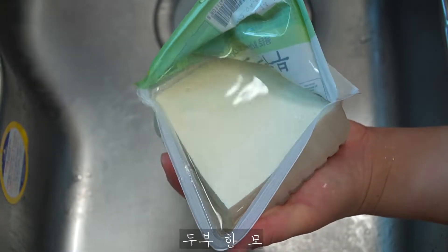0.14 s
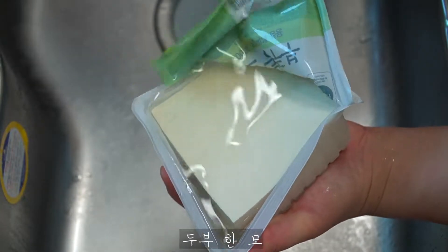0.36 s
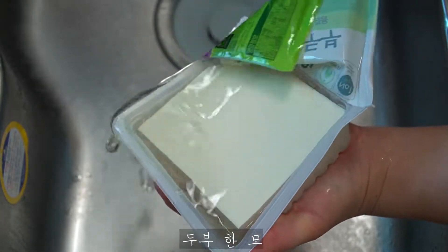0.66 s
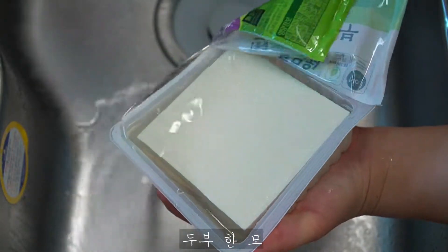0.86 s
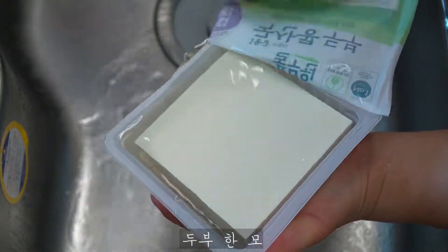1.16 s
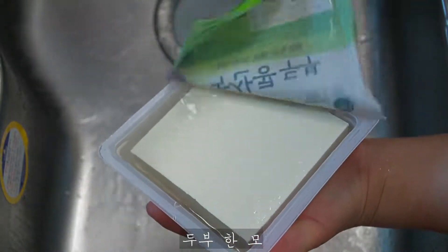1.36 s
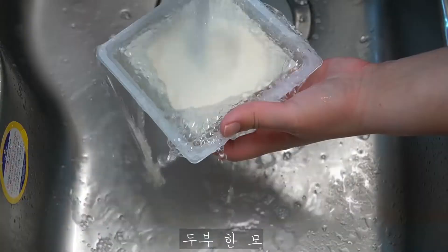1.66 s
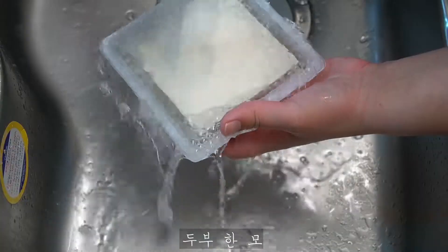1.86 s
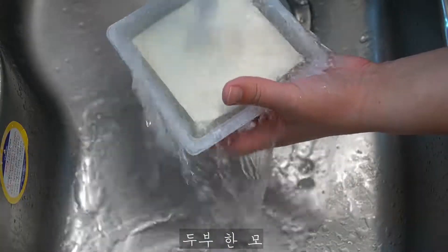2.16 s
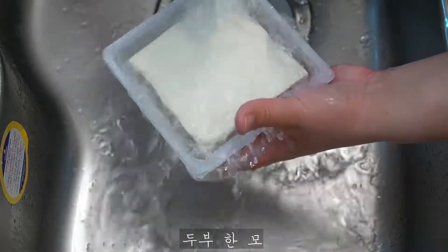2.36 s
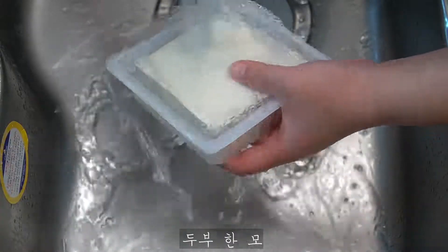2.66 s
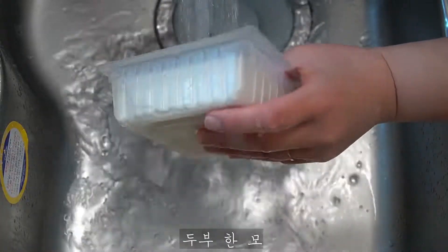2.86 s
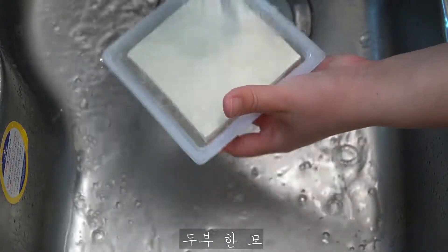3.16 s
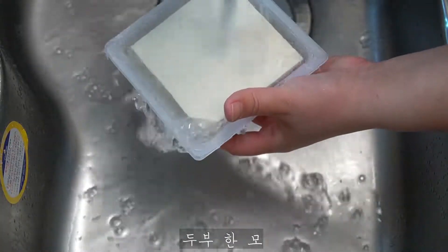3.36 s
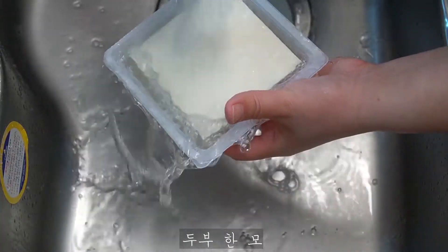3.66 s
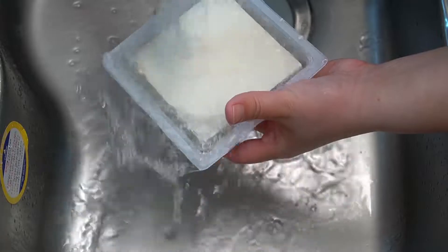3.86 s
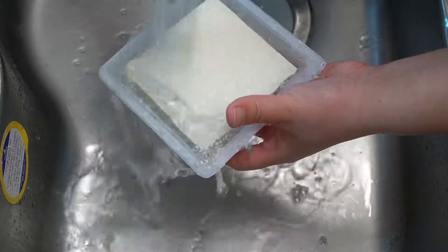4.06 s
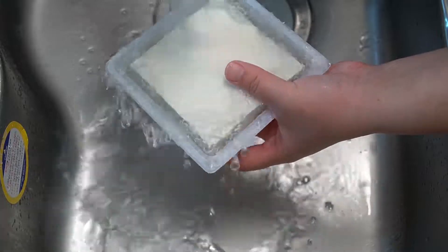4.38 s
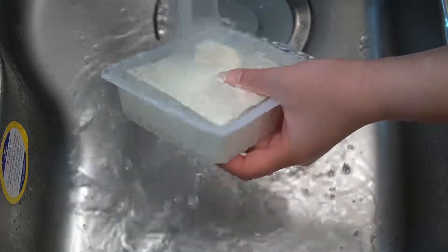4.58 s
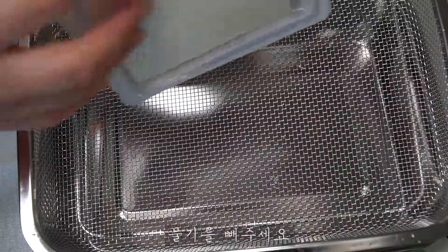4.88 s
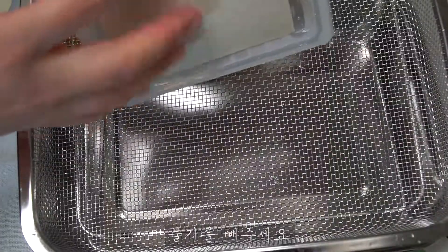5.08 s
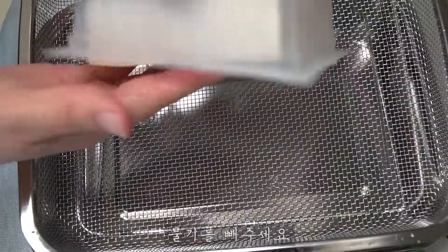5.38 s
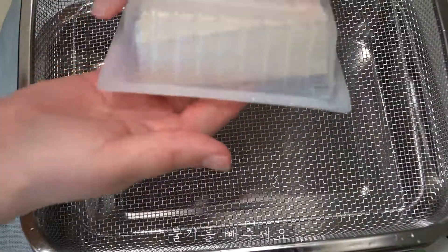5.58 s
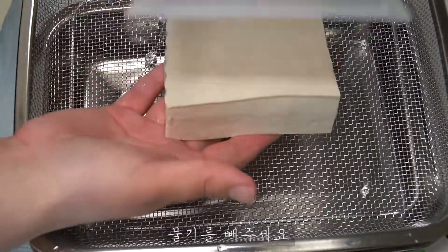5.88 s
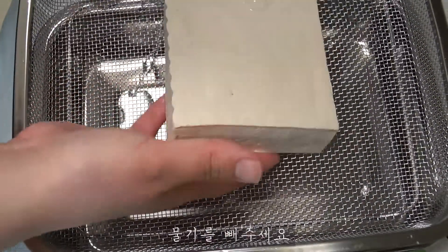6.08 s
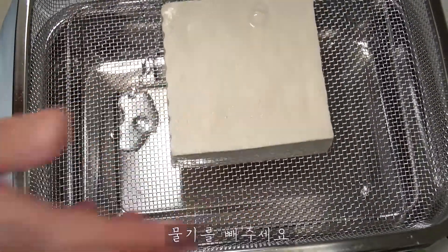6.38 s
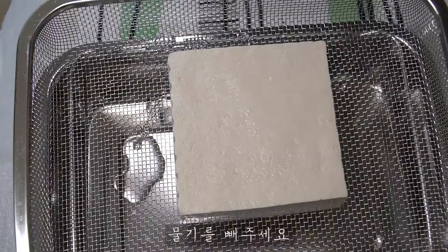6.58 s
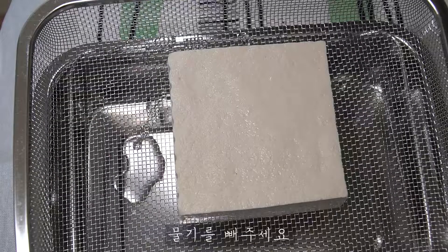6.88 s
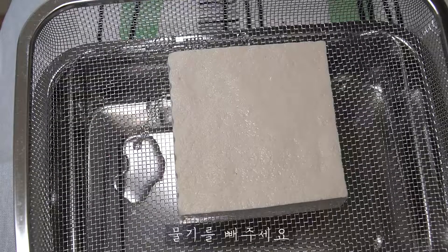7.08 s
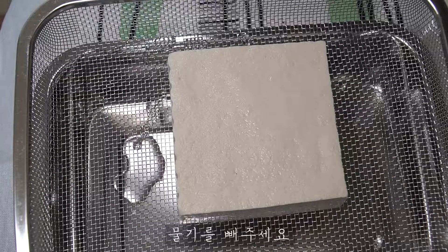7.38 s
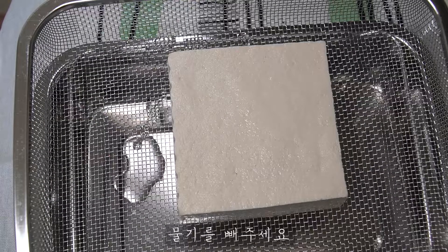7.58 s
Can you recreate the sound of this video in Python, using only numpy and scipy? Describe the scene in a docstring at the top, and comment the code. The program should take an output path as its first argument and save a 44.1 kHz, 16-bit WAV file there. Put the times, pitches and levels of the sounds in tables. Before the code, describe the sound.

Close up in a home kitchen, thin plastic film snaps and rustles off a small tub while liquid dribbles onto a steel sink. A tap abruptly hisses in, splashing on the tub and drumming below with a few bubbly notes. The water cuts off; over low hum, hands and a wet tofu block rub and knock a wire tray, and the metal pan shifts with dull thuds.

```python
"""Film snaps and rustles as it is peeled off a small tub, while brine dribbles into a steel sink. At 1.72 s the
scene changes: a tap sprays into the tub and the overflow drums on the sink; at 4.78 s the scene changes again
and both fall silent. Last, the wet block is turned out on a wire tray in a steel pan. A low kitchen hum runs
throughout. Shaped noise makes the film, spray and hum; clicks through resonances make the drops, sink and tray;
gliding tones make the bubbles and, with a wobble, the air in the filling tub."""
import sys
import numpy as np
from scipy import signal
from scipy.io import wavfile

SR = 44100
rng = np.random.default_rng(int(sys.argv[2]) if len(sys.argv) > 2 else 0)


def generate_wav(sig):
    """Save sig (samples, or channels by samples) to the path in sys.argv[1] as 16-bit PCM at SR."""
    pcm = np.round(np.clip(np.atleast_2d(sig).T, -1, 1) * 32767).astype(np.int16)
    wavfile.write(sys.argv[1], SR, pcm)


N = 341334

# Film snaps: start_s, level_db, colour_hz, colour_width (share of colour_hz), fall_by_60_db_s, rise_s
FILM_SNAPS = [(0.0103, -14.5, 5070, 0.52, 0.082, .0003), (0.0822, -10.5, 4270, 0.63, 0.1, .0004),
              (0.189, -27, 2100, 0.27, 0.14, 0.0082), (0.395, -31.5, 2500, 0.46, 0.24, 0.0089),
              (0.417, -27.5, 2640, 0.34, 0.1, .004), (0.505, -29.5, 2600, 0.38, 0.3, 0.0061),
              (0.5448, -25.5, 2070, .6, 0.25, .0005), (0.5771, -8.5, 2500, 0.68, 0.092, 0.00026),
              (0.6211, -10.5, 4870, 0.58, 0.072, 0.00026), (0.675, -18, 6050, .3, 0.036, .0003),
              (0.683, -15, 4420, 0.59, 0.05, 0.0028), (0.7575, -18.5, 1500, 0.94, 0.23, 0.0022),
              (0.787, -16.5, 3870, 1, 0.097, 0.0076), (0.872, -30.5, 7100, 0.75, 0.075, 0.006),
              (0.9516, -24.5, 1650, 1, 0.078, 0.00092), (1.052, -28, 1490, 0.54, 0.061, 0.0008),
              (1.101, -22, 1530, 0.32, 0.15, 0.00033), (1.1396, -24.5, 6240, .4, .1, 0.00034),
              (1.159, -13.5, 3900, 1, 0.15, 0.00027), (1.3072, -31.5, 6000, 1, 0.12, .001),
              (1.3301, -18.5, 2390, 1, 0.087, 0.0031), (1.4268, -28, 1800, 0.72, 0.2, 0.0052),
              (1.5668, -38, 1510, 0.57, 0.082, .0013), (1.593, -30, 7450, 1, 0.096, 0.0059),
              (1.645, -31, 2220, .33, .12, .007)]
# Film rustle over time: time_s, level_db
FILM_RUSTLE = [(0.0, -45), (0.21, -81), (0.45, -58), (0.66, -39.5), (0.75, -61), (0.9, -57), (1.06, -59),
               (1.26, -51.5), (1.55, -78), (1.71, -57)]
# Colour of the rustle before its tilt: pitch_hz, level_db (per Hz)
FILM_COLOUR = [(900, -12), (1600, -15), (2650, -5.5), (4000, -17.5), (8000, -19), (16000, -7)]
RUSTLE_TILT_DB = -1.9   # per octave
SNAP_PAN_DB = -1.3   # left minus right

# Slaps of spilled water on the steel: start_s, level_db
WATER_SLAPS = [(0.576, -18.5), (0.758, -19), (0.949, -28), (1.033, -34), (1.051, -31.5), (1.101, -27),
               (1.314, -27.5), (1.568, -34.5), (1.639, -37)]
# Ways the sink sheet rings: pitch_hz, width_hz, level_db
SINK_MODES = [(63, 25, -15.5), (149.8, 30, 2.5), (276.5, 23, -10.5), (296.8, 39.3, -1), (350, 36, -4.5),
              (383.3, 38, -8.5), (412.5, 20, -12.5), (484.5, 68, -16.5), (539, 53, -17.5), (576, 30, -17),
              (598.4, 43, -16.5), (669, 37, -11), (746, 68, -11.5), (835.6, 70, -13), (1066, 184, -17.5),
              (1276, 540, -15.5), (1700, 350, -25.5)]
# Thin stream on the sink floor: time_s, drumming_db, hardness_db (per octave), boom_db (modes below 200 Hz)
SINK_STREAM = [(0, -59, 3, -66), (.4, -54.5, 4.5, -65), (.74, -48.5, 6, -60), (.79, -39, 4.5, -37),
               (1.05, -42.5, 1.5, -35.5), (1.4, -36.5, 4, -41), (1.54, -58, 5.5, -48),
               (1.71, -38, 3.5, -35), (1.73, -30, 3, -31.5), (2.35, -29.5, -0.5, -33), (2.8, -34, 4, -31),
               (2.9, -36.5, 7, -49), (3.12, -36.5, 6.5, -33), (3.2, -32.5, -4.5, -48),
               (3.45, -36.5, -6, -43.5), (3.64, -37.5, -3, -35), (3.7, -32.5, 0.5, -33.5),
               (4.78, -33, 4.5, -38)]
# Lumps of water landing on the sink: start_s, hold_s, drumming_db, boom_db (modes below 200 Hz)
WATER_LUMPS = [(.008, 0.021, -41.5, -56), (0.173, 0.02, -45, -64), (0.406, .02, -47.5, -58),
               (0.568, 0.0018, -23.5, -52), (0.652, 0.018, -37.5, -60), (0.752, 0.022, -24.5, -31),
               (0.831, 0.024, -35, -30), (0.923, .09, -54, -38), (1.185, 0.028, -28, -34),
               (1.313, 0.037, -33, -35), (1.394, 0.07, -33, -44), (1.563, 0.011, -43, -33),
               (1.816, 0.031, -35, -29), (1.897, .05, -37, -26), (2.007, 0.027, -24.5, -46),
               (2.093, 0.082, -22.5, -26), (2.187, 0.061, -31, -37), (2.284, 0.088, -30.5, -25.5),
               (2.408, 0.043, -26, -39), (2.48, 0.043, -37, -31), (2.567, 0.074, -25, -26),
               (2.79, 0.055, -31.5, -30), (2.965, 0.04, -30.5, -44), (3.366, 0.0051, -24.5, -48),
               (3.652, .05, -29, -40), (3.777, 0.024, -28.5, -30), (3.849, 0.04, -30, -29.5),
               (3.956, 0.032, -28, -38), (4.095, 0.055, -27.5, -30), (4.172, 0.032, -27, -33),
               (4.272, 0.027, -33, -44), (4.389, 0.031, -27, -32), (4.523, 0.028, -41, -43),
               (4.624, 0.1, -34, -33.5)]
LUMP_RISE_S, LUMP_T60_S, LUMP_HARDNESS_DB = 0.0098, 0.13, 0.65   # hardness per octave
LANDING_DB = 22   # thump as a lump lands, added to its drumming or boom level

# Colour of the kitchen hum: pitch_hz, level_db (per Hz)
HUM_COLOUR = [(25, -84), (54, -5.5), (100, -14.5), (137, -1), (222, -22), (430, -23), (1020, -30.5),
              (2000, -31), (3500, -33.5), (5500, -31), (9000, -38.5), (16000, -39.5)]
# Bands that stand out of the hum once the water stops: pitch_hz, width_hz, level_db
HUM_BANDS = [(458, 90, 4), (1170, 90, 2), (1810, 120, 2), (3290, 600, 6.5), (5400, 450, -3),
             (6820, 500, -3)]
HUM_DB = -49.5

# Tap spray over time: time_s, level_db
TAP_SPRAY = [(1.73, -26), (2.55, -25.5), (2.82, -28.5), (2.91, -24), (3.1, -25.5), (3.35, -27.5),
             (3.7, -26.5), (4.76, -27)]
# Colour of the spray: pitch_hz, level_db (per Hz)
SPRAY_COLOUR = [(710, -13), (1260, -15), (1780, -14.5), (2180, -5.5), (2700, -5), (4050, -5), (5300, 2.5),
                (8300, -2.5), (13600, 1.5), (15900, 1.5)]
# Bands that the basin lifts out of the spray: pitch_hz, width_hz, level_db
BASIN_BANDS = [(2377, 310, -1), (3710, 200, -16), (5180, 190, -3), (5900, 150, -12), (7230, 770, -18)]
# Splashes as the jet breaks on the rim: start_s, level_db, colour_hz
RIM_SPLASHES = [(2.0531, -12, 5460), (2.1544, -11.5, 5300), (2.209, -15, 6800), (2.2547, -14, 7250),
                (2.3464, -20, 4590), (2.501, -15, 5050), (2.713, -10, 3270), (2.8554, -6.5, 6100),
                (3.1108, -10.5, 5180), (3.318, -10, 5300), (3.414, -15.5, 5400), (3.6677, -12, 5440),
                (4.0094, -11, 5680), (4.109, -8.5, 4000), (4.2756, -10, 5800), (4.4627, -13.5, 7900),
                (4.6114, -17, 7650), (4.7041, -10.5, 6750), (4.7625, -10, 4730)]
# Air above the water in the filling tub: time_s, level_db, pitch_hz
TUB_AIR = [(3.141, -46, 1233), (3.2, -39, 1282), (3.28, -38, 1265), (3.34, -36, 1247), (3.42, -37, 1244),
           (3.5, -56, 1140)]
# Bubbles in the filling tub: start_s, level_db, pitch_hz (at the start)
TUB_BUBBLES = [(3.248, -30, 1310), (3.3034, -22.5, 1240), (3.3723, -13.5, 1227), (3.459, -28, 1080),
               (4.7698, -18, 1274)]
TAP_ON_S, TAP_OFF_S = 1.718, 4.781
SPLASH_RISE_S, SPLASH_T60_S = 0.0027, 0.13
DROP_CYCLES = 16   # pitch of a drop divided by its resonance width

# Hands and block rub the wires: start_s, rise_s, level_db, fall_by_60_db_s, brightness_db (per octave)
TRAY_RUBS = [(5.27, .01, -37.5, 0.32, 0.5), (5.319, 0.0047, -44, 0.25, -1),
             (5.635, 0.0036, -34, 0.37, -0.5), (5.645, 0.015, -32, 0.18, -1),
             (5.804, 0.0061, -23.5, 0.25, 6), (5.99, 0.042, -39.5, 0.2, 3), (6.124, .006, -47.5, 0.36, 0),
             (6.229, 0.081, -24.5, 0.17, 1), (6.269, 0.04, -22.5, 0.23, -0.5),
             (6.629, 0.0052, -44, 0.58, -0.5), (6.86, .02, -52, 0.2, 9), (7.321, 0.038, -24, 0.31, 0.5),
             (7.43, 0.03, -34, 0.27, -2.5), (7.566, .016, -33.5, 1.2, -0.5), (7.64, 0.044, -43, 1.1, 8)]
# Knocks on the tray: start_s, level_db, brightness_db (per octave)
TRAY_KNOCKS = [(5.282, -51, 13), (5.325, -54, 11), (5.641, -48.5, -9), (5.809, -28, 2.5), (6.029, -57, -2),
               (6.645, -44.5, 2)]
# Ways the tray and pan ring: pitch_hz, level_db, fall_by_60_db_s
TRAY_MODES = [(501, 0, 0.063), (822, 5.5, 0.032), (993, -19, 0.11), (1097, -0.5, 0.086), (1310, -4, 0.11),
              (1370, -12.5, 0.089), (1666, -2, 0.081), (1805, -11, 0.064), (2036, -12, 0.079),
              (2178, -3.5, 0.12), (2274, -1, 0.077), (2550, -29, .1), (2765, -3.5, 0.066),
              (2896, -11.5, 0.18), (3450, -13, 0.21), (3916, -9.5, 0.036), (4610, -10, 0.056),
              (5190, -9.5, 0.025), (6710, -14.5, 0.034)]
# Colour of the wet hiss before its tilt: pitch_hz, level_db (per Hz)
TRAY_HISS_COLOUR = [(180, -45), (300, -8.5), (502, -14), (603, -3.5), (787, -7), (2790, -4), (3130, -15.5),
                    (4500, -15), (8000, -21.5), (16000, -26)]
# The pan is shifted: start_s, thud_db, hollow_db, rim_db
PAN_SHIFTS = [(7.12, -42, -52.5, -70), (7.225, -45, -41, -60), (7.325, -31.5, -42, -39),
              (7.44, -47, -41.5, -42), (7.52, -46, -41.5, -42), (7.56, -27.5, -41, -38),
              (7.625, -40, -55, -43.5), (7.69, -47, -55, -62)]
# Thud, hollow and rim of the pan, one row each: pitch_hz, width_hz
PAN_PARTS = [(140, 14), (400, 22), (985, 57)]
SHIFT_RISE_S, SHIFT_HOLD_S, SHIFT_T60_S = 0.031, 0.032, 0.2
HANDS_NEAR_DB = -57.5   # faint steady touching under the rubs

# How alike left and right are: pitch_hz, likeness (0 to 1)
STEREO_LIKENESS = [(60, 1.0), (180, 1.0), (550, 0.6), (1650, 0.77), (4970, 0.55), (15000, 0.22)]
SIDES = np.array([[1], [-1]])   # left, right
RISE_DB = 24.5   # a swell climbs this much during its rise
CUTOFF_HZ = 15900


def from_db(db):
    """Turns decibels into a gain."""
    return 10 ** (np.asarray(db) / 20)


def rms_one(x):
    """Scales a sound to an average strength (rms) of 1."""
    return x / np.sqrt(np.mean(x ** 2) + 1e-20)


def in_time(rows):
    """Draws straight lines between the rows: one curve per column after the time."""
    time_s, *columns = np.vstack(rows).T
    return [np.interp(np.arange(N) / SR, time_s, column) for column in columns]


def between(start_s, end_s):
    """1 inside the span, 0 outside, with 2 ms edges."""
    t = np.arange(N) / SR
    return np.clip(np.minimum(t - start_s, end_s - t) * 500, 0, 1)


def at_hz(points, hz):
    """Reads a pitch table at hz, with pitch spaced by octaves."""
    pitch_hz, value = np.array(points).T
    return np.interp(np.log(hz), np.log(pitch_hz), value)


def drift(rate_hz):
    """Slow chance of spread 1: noise at every 20th sample, smoothed twice by a low-pass."""
    r = np.exp(-40 * np.pi * rate_hz / SR)
    noise = rng.standard_normal(N // 20 + 2002)
    slow = signal.lfilter([1], [1, -2 * r, r * r], noise)[2000:]   # skip the filter's settling
    return np.interp(np.arange(N) / 20, np.arange(len(slow)), rms_one(slow))


def resonate(x, hz, width_hz):
    """Rings like one mode of a body: a two-pole resonance with gain 1 at its peak."""
    r = np.exp(-np.pi * width_hz / SR)
    feed = np.array([1, 0, -1]) * (1 - r * r) / 2
    back = [1, -2 * r * np.cos(2 * np.pi * hz / SR), r * r]
    return signal.lfilter(feed, back, x + 1e-18)


def lift(x, bands):
    """Adds resonances on top of the sound."""
    return x + sum(from_db(db) * resonate(resonate(x, hz, width_hz), hz, width_hz)
                   for hz, width_hz, db in bands)


def grains(per_s, spread_db):
    """Random clicks of uneven size and sign; rms 1."""
    size_db = spread_db * np.minimum(rng.exponential(1, N), 4)   # a cap keeps giants rare
    sizes = from_db(size_db) * rng.choice([-1, 1], N)
    return rms_one(sizes * (rng.random(N) < per_s / SR))


def swells(start_s, peak_db, rise_s, hold_s, t60):
    """One row of gain per event: rise, hold, then fall by 60 dB."""
    t = np.arange(N) / SR
    for s, db, rise, hold, fall in np.broadcast(start_s, peak_db, rise_s, hold_s, t60):
        i, j = round(s * SR), round((s + rise + hold + fall) * SR)
        corners_s = np.cumsum([0, rise, hold, fall])
        gain = np.zeros(N)
        gain[i:j] = from_db(db + np.interp(t[i:j] - s, corners_s, [-RISE_DB, 0, 0, -60]))
        yield gain


def coloured(mid, spectrum, tilt_db, patchy_db, flicker_hz=19.5):
    """Third-octave bands with own level, flicker and stereo width; rms near 1 before tilt and flicker."""
    out, power = 0, 0
    together = drift(flicker_hz)   # the flicker that all bands share
    side = rng.standard_normal(N)
    edges = 25 * 2 ** (np.arange(29) / 3)
    edges = edges[edges > spectrum[0][0] * .8]
    for k, (low, high) in enumerate(zip(edges, edges[1:])):
        band = signal.butter(2, [low, high], "band", fs=SR, output="sos")
        m, s = signal.sosfilt(band, [mid, side]) * (-1) ** k   # every other band is flipped
        hz = np.sqrt(low * high)
        alike = at_hz(STEREO_LIKENESS, hz)
        level = from_db(at_hz(spectrum, hz))
        flicker_db = patchy_db * (.5 * together + drift(flicker_hz))
        gain = level * from_db(tilt_db * np.log2(hz / 4000) + flicker_db)
        out = out + gain * (np.sqrt(1 + alike) * m + np.sqrt(1 - alike) * s * SIDES)
        power += level ** 2 * 2 * (high - low) / SR
    return out / np.sqrt(power)


def film():
    """Creases snap: a crack, then a fast-dying hiss with a fainter kitchen tail; fine crackle between."""
    level_db, = in_time(FILM_RUSTLE)
    crackle = coloured(grains(2700.0, 2.6), FILM_COLOUR, RUSTLE_TILT_DB, patchy_db=1.5)
    out = from_db(level_db) * between(-1, TAP_ON_S) * crackle
    t = np.arange(SR // 3) / SR
    for s, peak_db, hz, share, t60, rise_s in FILM_SNAPS:
        near, left, right = rng.standard_normal((3, len(t)))
        crack = near * from_db(2.5 - 60 * t / 0.0072)
        fading = from_db(-2 - 60 * t / t60) + from_db(-22 - 60 * t / 0.56)   # hiss, then kitchen tail
        hiss = (.7 * near + 0.63 * np.array([left, right])) * fading
        burst = (crack + hiss) * np.minimum((t + 1 / SR) / rise_s, 1)   # a slow rise smears the crack
        treble = signal.lfilter([1, -1], [1, -.8], burst)
        snap = resonate(burst, hz, share * hz) + from_db(-19.5) * treble
        i = round(s * SR)
        out[:, i:i + len(t)] += from_db(peak_db + SNAP_PAN_DB / 2 * SIDES) * snap
    return out


def sink():
    """A thin stream, heavier lumps and sharp slaps of water drive the sheet modes of the basin."""
    level_db, hard_db, boom_db = in_time(SINK_STREAM)
    start_s, hold_s, drum_db, lump_boom_db = np.transpose(WATER_LUMPS)
    lump_drum, lump_boom = (sum(swells(start_s, db, LUMP_RISE_S, hold_s, LUMP_T60_S))
                            for db in (drum_db, lump_boom_db))
    landing_at = ((start_s + LUMP_RISE_S / 2) * SR).astype(int)
    slaps = np.zeros(N)
    slaps[[round(s * SR) for s, db in WATER_SLAPS]] = from_db(np.array(WATER_SLAPS)[:, 1])
    slaps = signal.lfilter([1], [1, -from_db(-60 / (0.024 * SR))], slaps)   # falls 60 dB in 24 ms
    uneven = from_db(2.1 * drift(29.0))
    out = 0
    for hz, width_hz, mode_db in SINK_MODES:
        octaves = np.log2(hz / 300)
        if hz < 200:
            flow, landing_db = np.hypot(from_db(boom_db), lump_boom), lump_boom_db
        else:
            stream = from_db(level_db + hard_db * octaves)
            flow = np.hypot(stream, lump_drum * from_db(LUMP_HARDNESS_DB * octaves))
            landing_db = drum_db
        drive = grains(3000., 1.96) * (uneven * flow + slaps * from_db(7.5 * octaves))
        thumps = np.zeros(N)
        thumps[landing_at] = from_db(landing_db + LANDING_DB) * rng.choice([-1, 1], len(WATER_LUMPS))
        ringing = resonate(resonate(drive, hz, width_hz) + thumps, hz, width_hz)
        out = out + from_db(mode_db + 40.0) * ringing / np.sqrt(width_hz)
    return out * between(-1, TAP_OFF_S)


def kitchen_hum():
    """Steady noise, strongest in the bass; a few bands are lifted once the water stops."""
    hum = from_db(HUM_DB) * coloured(rng.standard_normal(N), HUM_COLOUR, 0, patchy_db=0.0, flicker_hz=7.7)
    return hum + (lift(hum, HUM_BANDS) - hum) * between(TAP_OFF_S, 9)


def droplets(per_s, cycles, burst_db):
    """Drops ring briefly at 24 treble pitches; they come in bursts and each pitch wanders sideways."""
    clicks, dealt, out = grains(per_s, 4.), rng.integers(0, 24, N), 0
    bursts = [from_db(burst_db * drift(7.6)) for group in range(6)]   # four neighbouring sizes share one
    for k, hz in enumerate(np.geomspace(3000, 13000, 24)):
        ring = resonate(clicks * (dealt == k) * bursts[k // 4], hz, hz / cycles) / np.sqrt(hz)
        out = out + ring * from_db(0.5 * drift(3.3) * SIDES)
    return rms_one(out)


def splashes():
    """Each splash is a short swell of noise around a colour of its own."""
    out, t = np.zeros((2, N)), np.arange(SR // 8) / SR
    for s, peak_db, hz in RIM_SPLASHES:
        near, left, right = rng.standard_normal((3, len(t)))
        swell = from_db(peak_db - 60 * t / SPLASH_T60_S) * np.minimum(t / SPLASH_RISE_S, 1)
        noise = near + 0.61 * np.array([left, right])
        i = round(s * SR)
        out[:, i:i + len(t)] += resonate(swell * noise, hz, .5 * hz)
    return out


def filling_air():
    """Air in the filling tub sings: slow noise times a tone makes a band that follows the pitch."""
    air_db, air_hz = in_time(TUB_AIR)
    wobble = rms_one(resonate(grains(800., 1.8), 36, 56.0))
    tone = np.sin(2 * np.pi * np.cumsum(air_hz) / SR)
    return from_db(air_db) * wobble * tone * between(TUB_AIR[0][0], TUB_AIR[-1][0])


def bubbles():
    """Each bubble is a short dying tone that rises slightly in pitch."""
    out, t = np.zeros(N), np.arange(SR // 20) / SR
    for s, peak_db, hz in TUB_BUBBLES:
        tone = np.sin(2 * np.pi * hz * t * (1 + 0.51 * t))
        i = round(s * SR)
        out[i:i + len(t)] += from_db(peak_db - 60 * t / 0.047) * tone * np.minimum(t / 0.004, 1)
    return out


def tap():
    """Dense spray fizzes on the water, drops patter, the tub sings as it fills and a few bubbles ring."""
    level_db, = in_time(TAP_SPRAY)
    fizz = grains(9000. * from_db(2.2 * drift(40.)), 1.7)
    spray = coloured(fizz, SPRAY_COLOUR, 0, patchy_db=1.5)
    spray = spray + from_db(-5) * droplets(2500., cycles=DROP_CYCLES, burst_db=7.5)
    out = from_db(level_db) * lift(spray, BASIN_BANDS) + splashes() + filling_air() + bubbles()
    return out * between(TAP_ON_S, TAP_OFF_S)


def pan_shifts():
    """Swells of noise in three resonances: the pan's thud, hollow and rim."""
    start_s, *parts_db = np.transpose(PAN_SHIFTS)
    out = 0
    for db, (hz, width_hz) in zip(parts_db, PAN_PARTS):
        rumble = rms_one(resonate(grains(1500., 1.0), hz, width_hz))
        out = out + sum(swells(start_s, db, SHIFT_RISE_S, SHIFT_HOLD_S, SHIFT_T60_S)) * rumble
    return out


def tray():
    """Wires slip and are knocked: clicks into the pan's modes, a wet hiss, and thuds in its hollow."""
    start_s, rise_s, rub_db, rub_t60, rub_tilt_db = np.transpose(TRAY_RUBS)
    rubs = np.array(list(swells(start_s, rub_db, rise_s, 0, rub_t60)))
    level = from_db(HANDS_NEAR_DB) + rubs.sum(axis=0)
    tilt_db = rub_tilt_db @ rubs / level   # louder rubs count more in the brightness
    t = np.arange(SR // 4) / SR
    knock_at = [round(s * SR) for s, db, tilt in TRAY_KNOCKS]
    peak_db, bright_db = np.array(TRAY_KNOCKS)[:, 1:].T
    puff = np.zeros(N)   # a short breath of hiss with each knock
    for i, db in zip(knock_at, peak_db):
        puff[i:i + len(t)] += from_db(db + 5.5 - 60 * t / 0.06) * np.minimum(t / 0.004, 1)
    ringing = 0
    for hz, mode_db, t60 in TRAY_MODES:
        width_hz = np.log(1000) / np.pi / t60
        octaves = np.log2(hz / 2000)
        clicks = grains(600., 2.1) * level * from_db(-34.5 + tilt_db * octaves)
        clicks[knock_at] += from_db(peak_db + bright_db * octaves + rng.normal(0, 2.6, len(knock_at)))
        ring = resonate(clicks, hz, width_hz) * SR / (2 * np.pi * width_hz)
        ringing = ringing + from_db(mode_db) * ring
    hiss = coloured(grains(3000., 1.4), TRAY_HISS_COLOUR, tilt_db, patchy_db=3.5)
    hiss = hiss * (from_db(-10.0) * level + puff)
    # the right side is slightly louder
    return (hiss + ringing) * from_db(SIDES * -.6) * between(5.2, 9) + pan_shifts()


def scene():
    """Adds up all the sources."""
    return film() + sink() + kitchen_hum() + tap() + tray()


def record(dry):
    """The top is cut steeply."""
    low_pass = signal.cheby2(14, 60, CUTOFF_HZ, fs=SR, output="sos")   # 60 dB down from the cutoff up
    return signal.sosfilt(low_pass, dry)


dry = scene()
out = record(dry)
generate_wav(out)
```